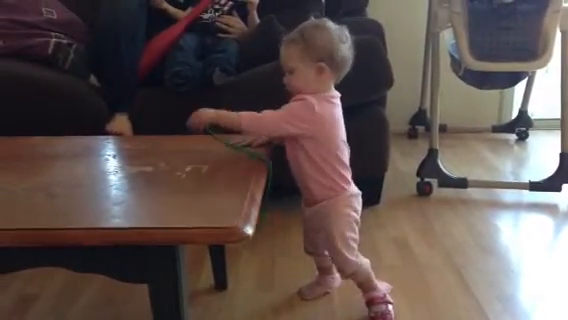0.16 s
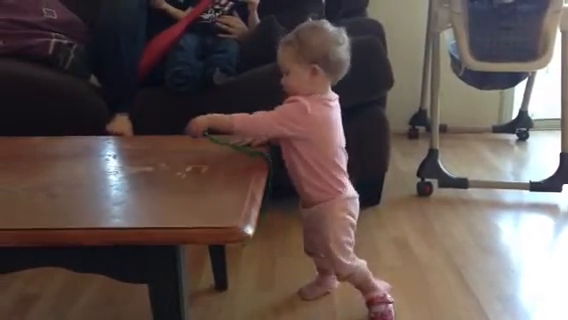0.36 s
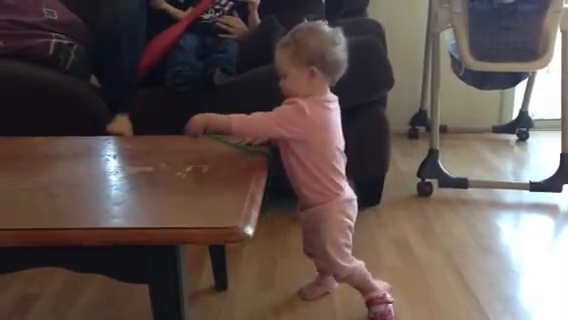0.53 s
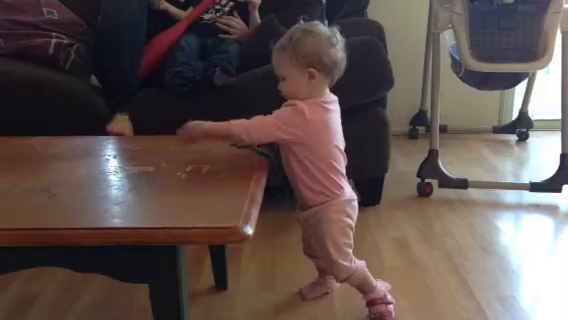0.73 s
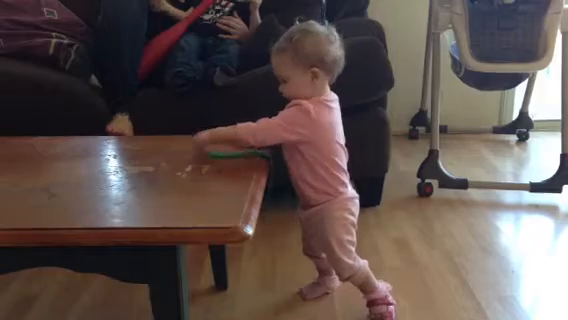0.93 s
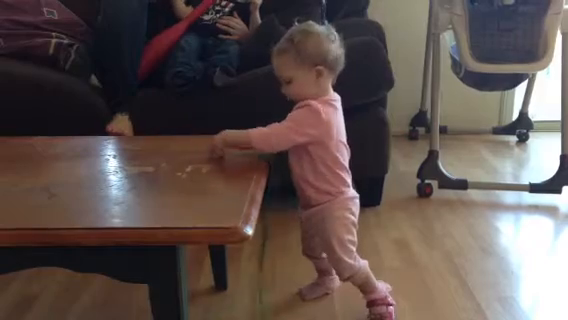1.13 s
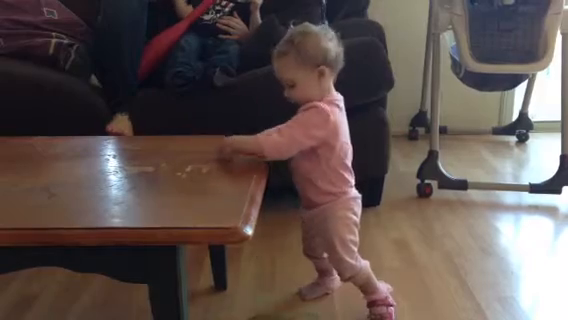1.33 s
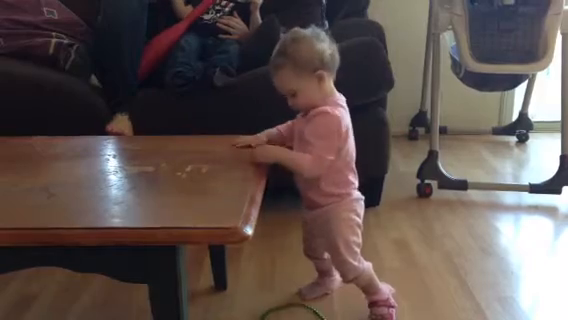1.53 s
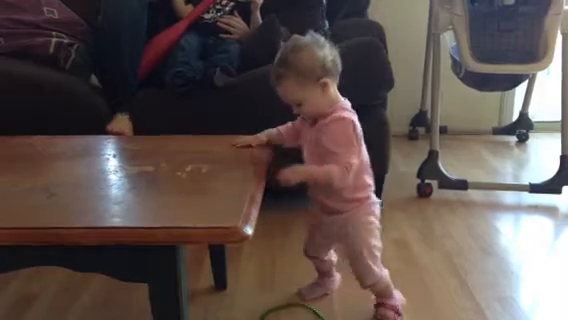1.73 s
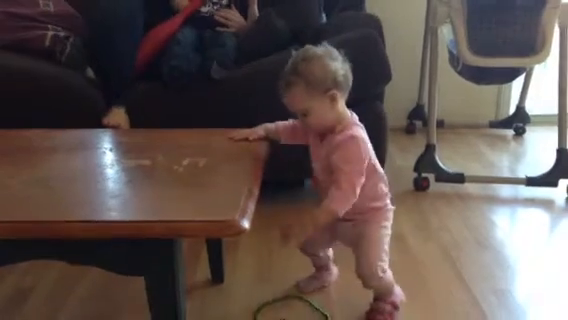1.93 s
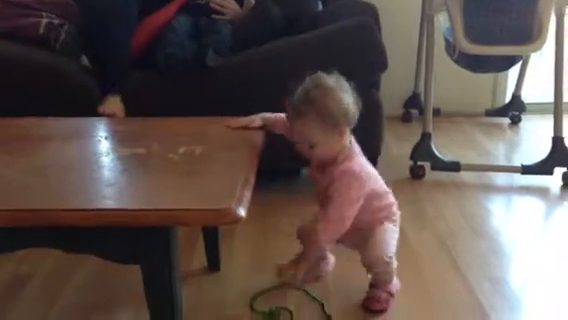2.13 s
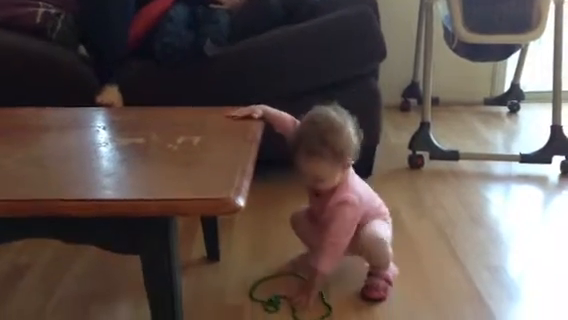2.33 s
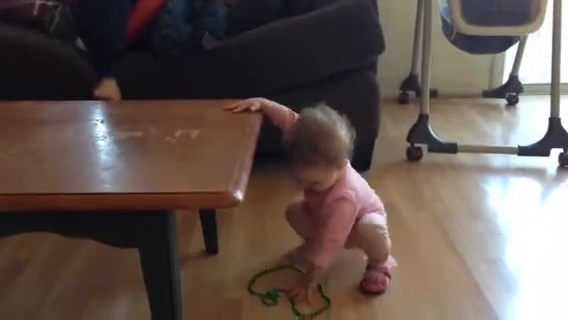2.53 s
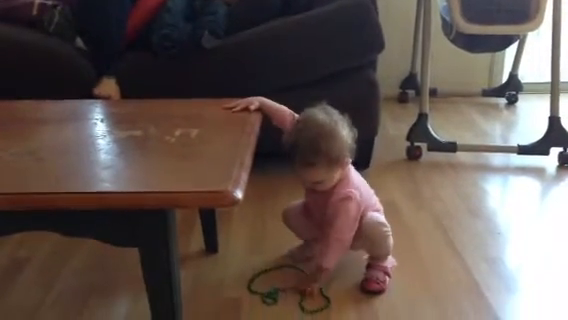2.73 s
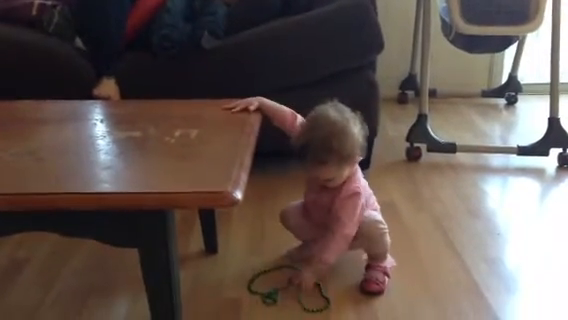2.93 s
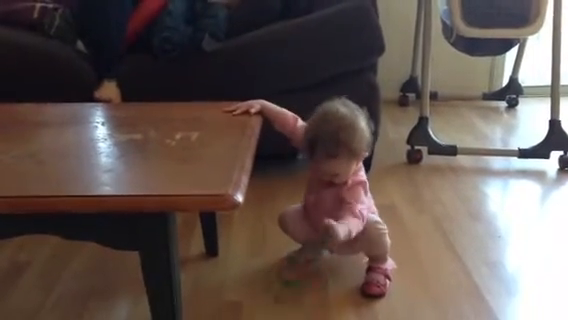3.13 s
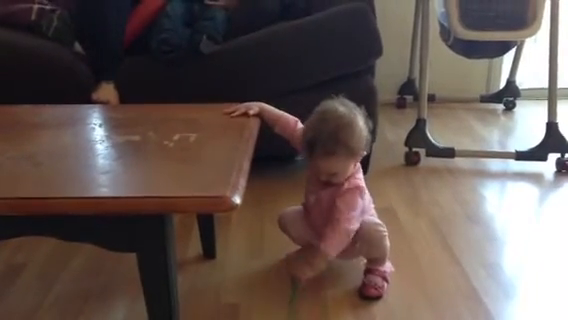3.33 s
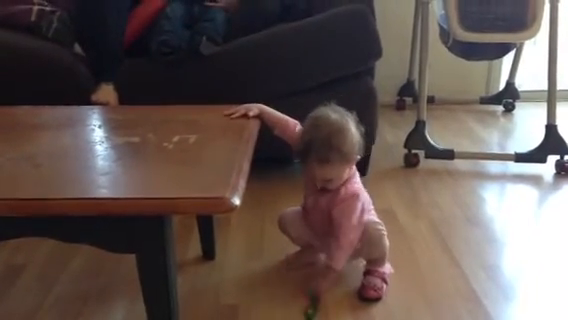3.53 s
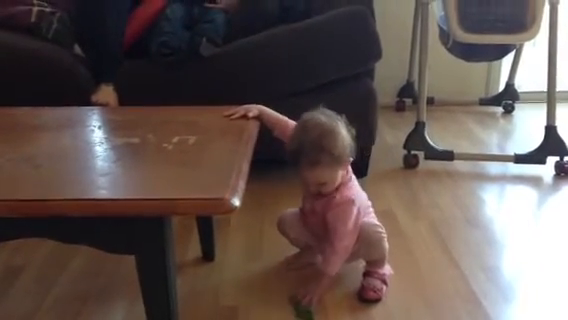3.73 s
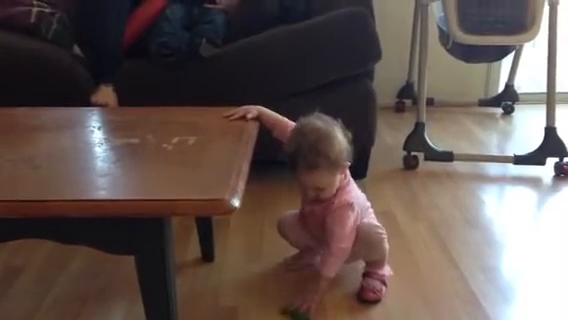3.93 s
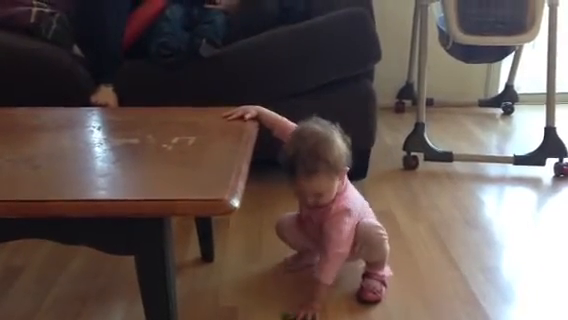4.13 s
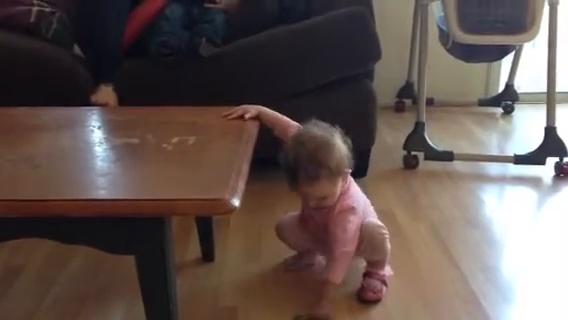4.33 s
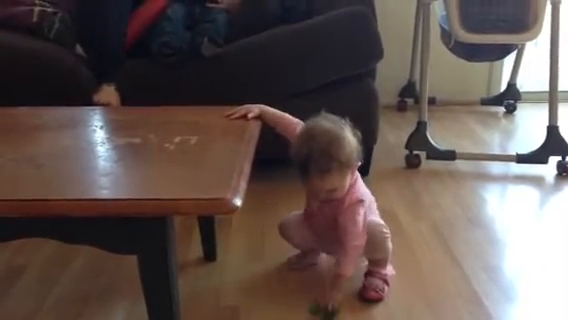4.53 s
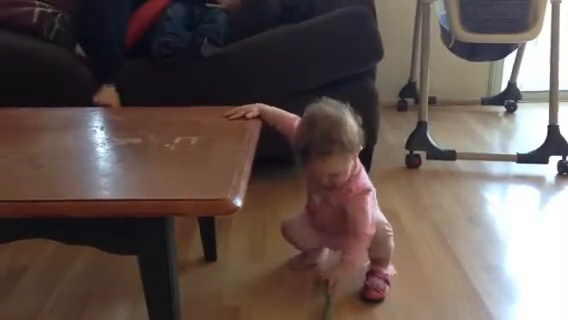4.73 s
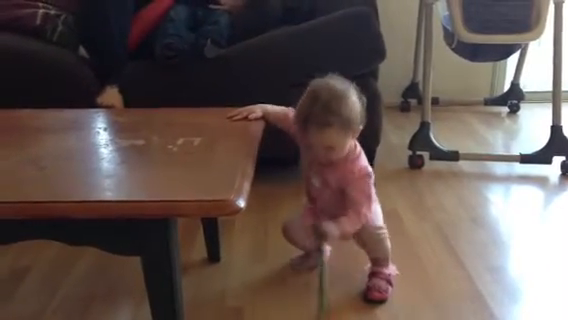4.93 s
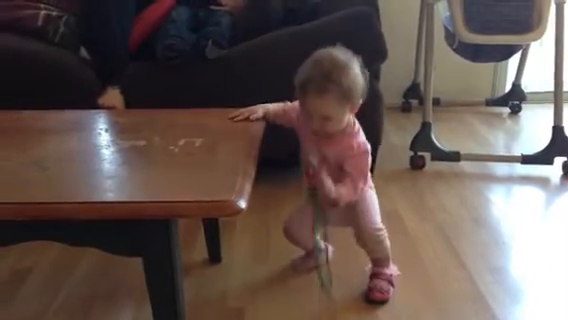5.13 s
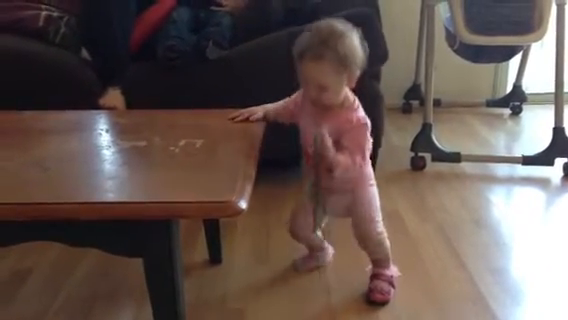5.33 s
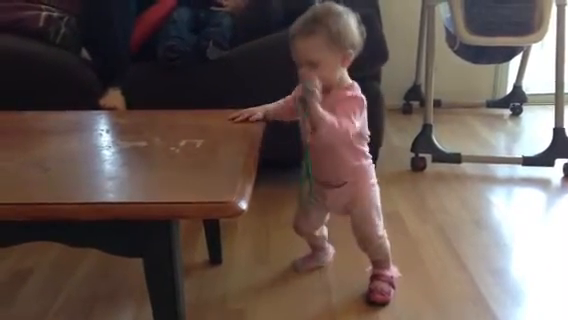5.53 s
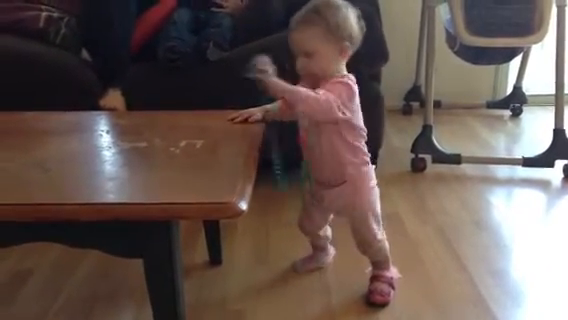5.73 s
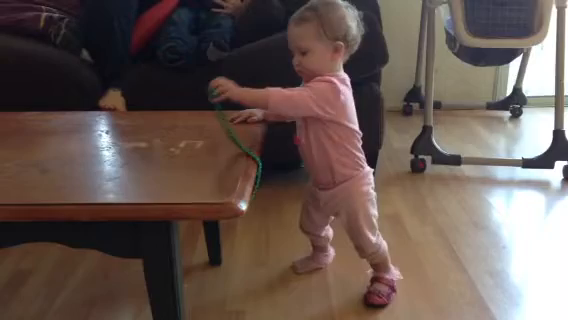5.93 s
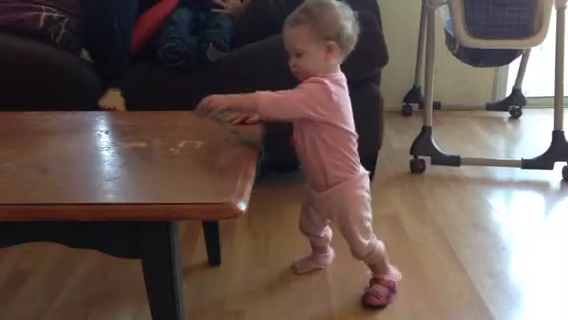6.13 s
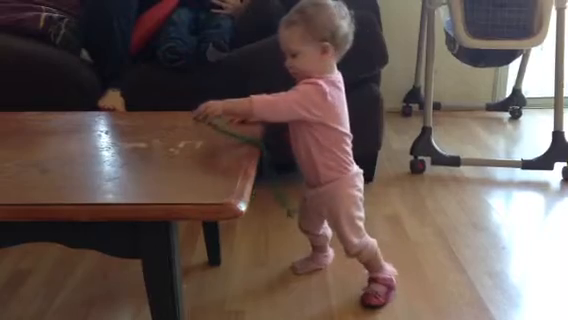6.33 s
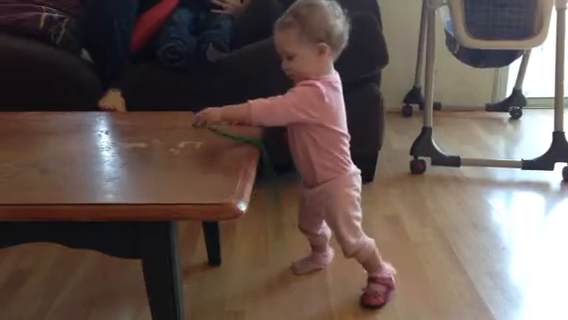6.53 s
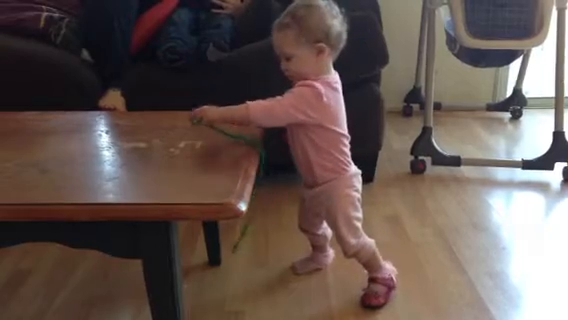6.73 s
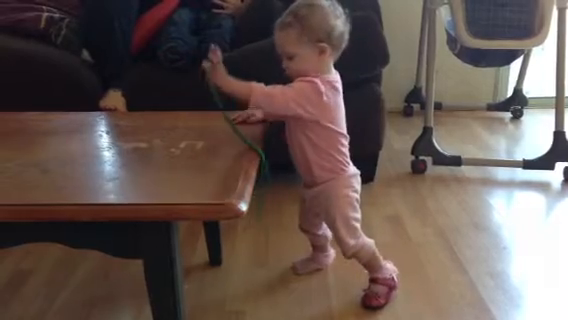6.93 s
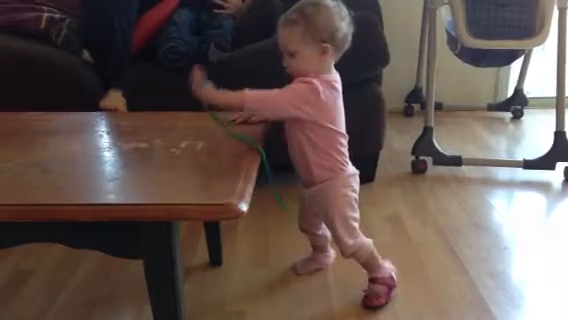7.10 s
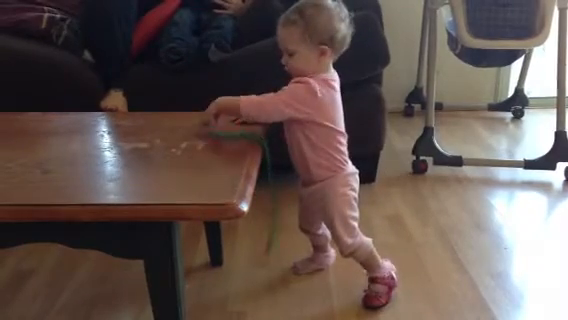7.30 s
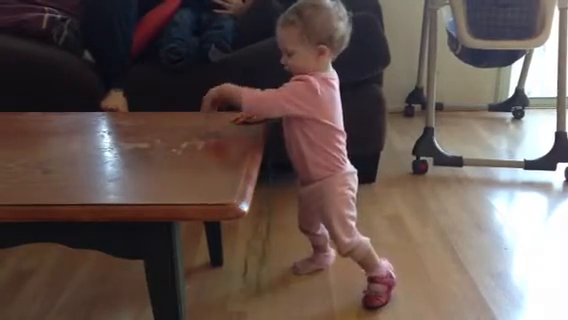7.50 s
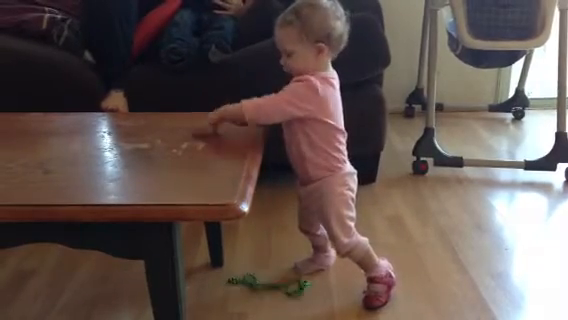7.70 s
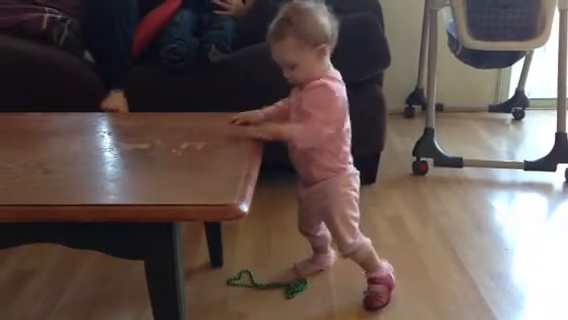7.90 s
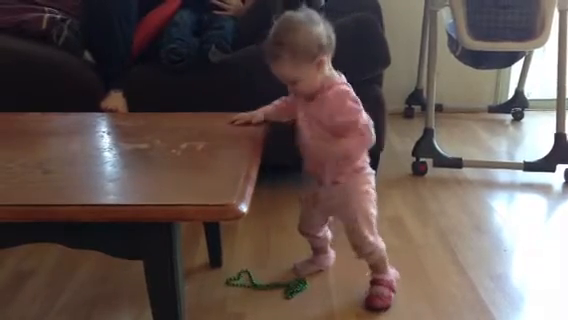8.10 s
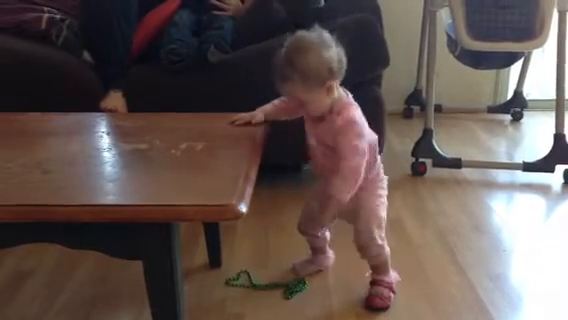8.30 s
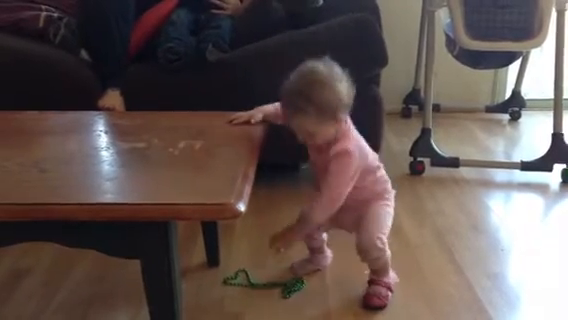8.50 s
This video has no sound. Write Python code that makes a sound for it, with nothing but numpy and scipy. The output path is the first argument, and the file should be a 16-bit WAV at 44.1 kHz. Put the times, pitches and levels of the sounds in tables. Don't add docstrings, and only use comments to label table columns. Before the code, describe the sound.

A string of plastic beads is dragged lightly over a wooden table, then slides off and hits the hardwood floor in a loud, dense burst of bright clacks. It is shuffled and shaken there, fading to tiny ticks. After a quiet gap it knocks onto the table again, drags, and falls once more. A small microphone hears it close in a reverberant living room, over low fridge hum and soft hiss.

```python
import sys
import numpy as np
from scipy import signal
from scipy.io import wavfile
from scipy.ndimage import uniform_filter1d

SR = 44100
rng = np.random.default_rng(int(sys.argv[2]) if len(sys.argv) > 2 else 0)


def unload_audio(sound):
    columns = np.transpose(np.atleast_2d(sound))
    steps = np.round(np.clip(columns, -1, 1) * 32767)
    wavfile.write(sys.argv[1], SR, steps.astype(np.int16))


def attenuation_scalar(level_db):
    decades = np.asarray(level_db, float) / 20
    return 10 ** decades


N = 377348

# start in seconds, peak in dB, click pitch in Hz.
FALLING_BEADS = [(1.2466, -12.6, 4930), (1.2607, -15.6, 5210), (1.2948, -14.7, 4910), (1.3263, -15.7, 4910),
                 (1.3367, -13.3, 4820), (1.3409, -12.5, 4620), (1.3467, -4.7, 5210), (1.35, -5.2, 5650),
                 (1.3549, -7.2, 4700), (1.3593, -3.3, 4750), (1.3638, -6.4, 5200), (1.3756, -8.1, 4850),
                 (1.4479, -18.5, 5290), (1.4714, -19, 4800), (1.5114, -28.2, 5980), (1.5871, -28.8, 5490),
                 (1.6249, -36.2, 5470), (7.6004, -11.5, 4740), (7.6077, -11.7, 4990), (7.6505, -13.9, 5300),
                 (7.6589, -10.7, 4580), (7.6687, -12.1, 4830), (7.6913, -9, 4780), (7.7008, -4.2, 5480),
                 (7.705, -7.5, 5270), (7.7575, -20.9, 5280), (7.8003, -21.1, 4920)]
# start in seconds, peak in dB, pitch in Hz.
HANDLED_BEADS = [(2.4171, -47.3, 5080), (2.8167, -40.7, 4960), (2.8974, -40.9, 4880), (3.0111, -25.1, 4860),
                 (3.0462, -27.5, 4680), (3.0936, -24.7, 4990), (3.1374, -25.2, 4680), (3.211, -28.2, 5110),
                 (3.3157, -27.1, 5330), (3.3219, -20.7, 5660), (3.352, -18, 6040), (3.3549, -16.4, 5730),
                 (3.3804, -10.7, 6200), (3.4014, -9, 5480), (3.4122, -12, 5940), (3.4958, -17.7, 5850),
                 (3.6062, -27.7, 5740), (3.6664, -26.7, 5400), (3.7265, -26.6, 5040), (3.821, -22.2, 4970),
                 (3.8287, -23.7, 5540), (3.8734, -32.8, 5250), (4.347, -30.1, 5600), (4.3917, -29.6, 5760),
                 (4.537, -31.5, 5570), (4.611, -31.6, 5290), (4.9244, -36, 5760), (5.0685, -29.8, 5180),
                 (5.0753, -31.7, 5570), (5.1655, -35.2, 5600)]
# start in seconds, length in seconds,
# mean gap in ms, peak in dB, click pitch in Hz.
BEAD_RUNS = [(1.252, 0.072, 5.92, -19.5, 4910), (1.363, 0.0146, 4.3, -10.5, 4970),
             (1.45, 0.0362, 8.1, -23, 5080), (1.592, 0.00965, 4, -31, 5300),
             (2.725, 0.0647, 12, -49.5, 4800), (2.97, .02, 10.7, -46.5, 4900),
             (3.059, 0.1328, 9, -30, 4880), (3.324, 0.0442, 6.62, -27, 5414),
             (3.387, 0.033, 7.08, -15, 5600), (3.502, .04, 8, -20.5, 5550),
             (3.668, 0.00863, 2.47, -31, 4950), (3.742, .06, 13.1, -36, 5250),
             (3.888, 0.066, 14.4, -41.5, 4894), (4.176, .14, 15.7, -42.5, 5080),
             (4.351, 0.128, 15.46, -33, 5640), (4.502, 0.154, 24.3, -37.5, 5402),
             (4.786, .33, 26, -40.5, 5652), (7.601, 0.02537, 3.03, -16.5, 4928),
             (7.627, 0.02006, 7.4, -22, 4950), (7.678, .021, 4.97, -14, 4735),
             (7.699, 0.02615, 3.72, -12, 4890), (7.785, 0.0417, 8.89, -23, 4750),
             (7.845, .055, 10.72, -35.5, 4642)]
# start in seconds, rise in seconds,
# top level in dB, fall in dB per second.
FLOOR_MOVEMENTS = [(1.245, 0.147, -36, 132.5), (2.05, 0.0447, -72.5, 23), (2.41, 0.0118, -65.5, 95.5),
                   (2.64, 0.027, -65.5, 18), (2.8, 0.053, -65.5, 120.5), (3.008, 0.087, -50, 150.5),
                   (3.315, 0.073, -36.5, 69), (3.45, 0.0635, -41, 99.5), (3.82, 0.0947, -59, 120),
                   (4.0, 0.041, -66.5, 23), (4.17, 0.053, -62.5, 18), (4.32, 0.0575, -50, 47.5),
                   (4.77, 0.009, -60.5, 33), (4.88, 0.058, -60.5, 42.5), (5.06, 0.067, -60, 200.5),
                   (7.599, 0.089, -32.5, 138)]
# frequency in Hz, spectral level in dB per Hz.
FLOOR_COLOUR = [(120, -77.5), (200, -38), (352, -8), (454, -14), (630, -19.5), (940, -19.5), (2850, -10),
                (3750, -3.5), (5200, -9), (7480, -12.5), (15500, -33)]
# frequency in Hz, spectral level in dB per Hz.
FIZZ_COLOUR = [(1000, -36.5), (4000, 7), (7000, 2), (10000, -5), (15500, -14)]
# start in seconds, level in dB.
BOARD_THUDS = [
    (1.35, -40),
    (1.36, -31.5),
    (3.353, -41),
    (3.4, -47.5),
    (7.602, -42.5),
    (7.622, -41),
    (7.7, -37),
    (6.271, -44.5),
]
# frequency in Hz, width in Hz, level in dB.
BOARD_MODES = [(184, 43, -11.5), (287.8, 67, -4), (423, 47, -0.5), (599.6, 290, 20.5), (922, 200, 3)]


def floor_beads():
    wood = tick(FLOOR_COLOUR, spread_ms=0.4357)
    fizz = tick(FIZZ_COLOUR, spread_ms=0.332)
    rows = FALLING_BEADS + HANDLED_BEADS + [row for run in BEAD_RUNS for row in run_of_beads(*run)]
    out = strikes(rows, [wood], body_db=1.5, chatter_ms=0.85, cycles=0.742, trim_db=1.4)
    for s, db, hz in rows:
        add(out, s - 20 / SR, attenuation_scalar(1.156 * db + 4.5) * signal.fftconvolve(fizz, chatter(2.2)))
    for s, db in BOARD_THUDS:
        add(out, s, attenuation_scalar(db + 20.5) * ring(BOARD_MODES))
    handling = movements(FLOOR_MOVEMENTS, haste=1)
    return out + patter(handling, [wood], per_s=1300, spread_db=4.0, trim_db=2.5)


# start in seconds, peak in dB, click pitch in Hz.
DRAGGED_BEADS = [(0.1576, -31.5, 2690), (0.1642, -45, 2710), (0.2127, -33, 2700), (0.2465, -29.5, 2380),
                 (0.2879, -34.5, 2300), (0.343, -49, 2800), (0.4346, -46, 2990), (0.4657, -39.5, 2200),
                 (0.6096, -41, 2900), (0.7039, -43, 1700), (0.8334, -39.5, 2930), (0.8415, -45, 2940),
                 (0.8775, -33.5, 2810), (1.0005, -38.5, 2900), (1.023, -35.5, 2230), (1.0622, -26.5, 2733),
                 (1.072, -22.5, 2500), (1.0867, -28, 2505), (1.1056, -26.5, 2900), (1.1387, -39, 2580),
                 (1.1473, -38, 3165), (1.1738, -46, 2950),
                 (5.881, -31, 2627), (5.8818, -18, 3010), (6.0213, -27, 2550), (6.0444, -32, 1590),
               (6.1215, -34.5, 1520), (6.1469, -41, 2980), (6.1477, -14.5, 3000), (6.154, -15.5, 2820),
               (6.238, -26.5, 1490), (6.5508, -40, 2670), (6.7377, -44, 2655), (6.8481, -38.5, 3000),
               (6.885, -19.5, 1607), (7.1165, -31.5, 2670), (7.1172, -33, 3060), (7.1509, -50, 2700),
               (7.1708, -26, 2820), (7.284, -22, 3000), (7.3534, -30, 1590), (7.4125, -23, 3030),
               (7.4492, -19, 3500)]
# start in seconds, rise in seconds,
# top level in dB, fall in dB per second, fizz against knocks in dB.
TABLE_MOVEMENTS = [(0, 0.00224, -57, 68, -6.5), (0.144, 0.0156, -44.5, 48.3, -27),
                   (.42, 0.012, -48, 376, -5), (.69, .06, -55.5, 5, -9), (.9, 0.132, -45.5, 97, -18),
                   (1.03, 0.0347, -39, 166, -11), (1.126, 0.0145, -42.5, 286, -10),
                   (5.877, 0.0049, -37, 155, -7), (5.9, 0.014, -45, 340, -20),
                   (6.015, 0.0044, -43.5, 20.2, -17.5), (6.11, 0.0415, -40, 200, -19),
                   (6.142, 0.0062, -28.5, 256, -4), (6.231, 0.0021, -30, 156.5, -5),
                   (6.3, 0.0346, -44.5, 470, -13.5), (6.5, 0.062, -61, 600, -18.5),
                   (6.7, 0.072, -52.5, 34.5, -14.5), (6.78, 0.0945, -48.5, 300, -25),
                   (6.88, 0.0042, -37.5, 232, -32), (6.95, 0.015, -61.5, 63, 1),
                   (7.11, 0.0767, -42, 28.2, -15.5), (7.27, 0.00984, -37, 72.9, -13),
                   (7.33, 0.0395, -40, 115.9, -28), (7.401, 0.0768, -33.5, 650, -10.5)]
# frequency in Hz, spectral level in dB per Hz.
TABLE_COLOUR = [(300, -68), (700, -21.5), (1000, -5), (1500, -5.5), (2000, -1), (3100, -3), (4500, -0.5),
                (7300, -10), (15500, -37.5)]
# frequency in Hz, width in Hz, level in dB.
TABLE_MODES = [(940, 45, -20), (1200, 45, -10), (1500, 80, -4), (1640, 80, -5), (1800, 90, -7),
               (2150, 90, -5), (2380, 90, -4), (2670, 110, -3), (3050, 120, 2), (3550, 120, -1),
               (4200, 200, -10), (5300, 300, -12)]


def table_beads():
    places = [attenuation_scalar(-3.0) * ring(TABLE_MODES, place_db=3.0) for _ in range(12)]
    for wood in places:
        add(wood, 0, attenuation_scalar(-6.0) * tick(TABLE_COLOUR, spread_ms=0.9073))
    out = strikes(DRAGGED_BEADS, places, body_db=17.5, chatter_ms=5.2, cycles=2.0, trim_db=-10.5)
    knock_rows = [row[:4] for row in TABLE_MOVEMENTS]
    fizz_rows = [(s, rise, db + bright, fall) for s, rise, db, fall, bright in TABLE_MOVEMENTS]
    knocks = movements(knock_rows, haste=1)
    fizz = movements(fizz_rows, haste=1.9)
    out += patter(knocks, places, per_s=1800, spread_db=4.0, trim_db=-2.0)
    return out + patter(fizz, [tick(FIZZ_COLOUR, spread_ms=0.3)], per_s=2480, spread_db=2.5, trim_db=-2.0)


def run_of_beads(start, length, gap_ms, db, hz):
    gap_scatter, strength_scatter_db, pitch_scatter = 0.6, 2, 0.06
    luck = rng.standard_normal((30, 3))
    gaps = gap_ms / 1000 * np.exp(gap_scatter * luck[:, 0] / 2)
    s = np.cumsum(gaps) - gap_ms / 2000
    peak_db = db + strength_scatter_db * luck[:, 1]
    pitch = hz * (1 + pitch_scatter * luck[:, 2])
    rows = np.transpose([start + s, peak_db, pitch])
    return list(rows[s < length])


def strikes(rows, bodies, body_db, chatter_ms, cycles, trim_db):
    out = np.zeros(N)
    for k, (s, db, hz) in enumerate(rows):
        add(out, s - 64 / SR, attenuation_scalar(db + trim_db) * bead(hz, cycles, fall=0.11))
        knock = signal.fftconvolve(bodies[k % len(bodies)], chatter(chatter_ms))
        add(out, s - 20 / SR, attenuation_scalar(db + trim_db + body_db) * knock)
    return out


def bead(hz, cycles, fall):
    u = np.arange(-64, 128) / SR * hz
    swell = np.exp(-0.5 * (u / cycles) ** 2)
    return swell * np.cos(2 * np.pi * (u - fall * u ** 2 / 2 + rng.random()))


def chatter(ms):
    age_ms = np.arange(400) / SR * 1000
    burst = rng.standard_normal(400) * np.exp(-age_ms / ms)
    return burst / np.linalg.norm(burst)


def patter(level, bodies, per_s, spread_db, trim_db):
    chance = per_s / SR * attenuation_scalar(2.6 * drift(200))
    size = attenuation_scalar(spread_db * np.minimum(rng.exponential(1, N), 3)) * rng.choice([-1., 1.], N)
    knocks = attenuation_scalar(trim_db) * level * evened(size * (rng.random(N) < chance))
    place = rng.integers(0, len(bodies), N // 600 + 1).repeat(600)[:N]
    return sum(signal.oaconvolve(knocks * (place == k), body)[:N] for k, body in enumerate(bodies))


def movements(rows, haste):
    swell_db, longest_s = 11.5, 0.36
    t, power = np.arange(N) / SR, np.zeros(N)
    for s, rise, db, fall in rows:
        u = t[:round((abs(rise) + longest_s) * SR)] - rise
        shape_db = np.where(u < 0, swell_db * u / rise, -haste * fall * u)
        add(power, s, attenuation_scalar(2 * (db + shape_db)))
    return np.sqrt(power)


def ring(modes, place_db=0):
    t = np.arange(SR // 12) / SR
    luck = rng.standard_normal((len(modes), 2))
    out = np.zeros(len(t))
    for (hz, width, db), (strength, side) in zip(modes, luck):
        gain = np.sign(side) * attenuation_scalar(db + place_db * strength) * np.sqrt(width)
        out += gain * np.exp(-np.pi * width * t) * np.sin(2 * np.pi * hz * t)
    return out / np.linalg.norm(out)


def tick(points, spread_ms):
    hz = np.fft.fftfreq(4096, 1 / SR)
    log_gain = read(points, abs(hz)) * np.log(10) / 20
    lag = 4 * np.pi * spread_ms / 1000 * np.sqrt(4000 * abs(hz)) * np.sign(hz)
    minimum_phase = np.conj(signal.hilbert(log_gain))
    click = np.fft.ifft(np.exp(minimum_phase - 1j * lag)).real[:1024]
    return click / np.linalg.norm(click)


# frequency in Hz, decay time to -60 dB in seconds.
ROOM_DECAY = [(200, 0.15), (660, 0.43), (1740, 0.305), (4590, 0.45), (12100, 0.34)]
# frequency in Hz, level against the direct sound in dB.
ECHO_TINT = [(300, 3.5), (1000, 7), (3300, 3), (5000, -2), (8000, 2.5), (14000, 10)]


def room(x, wet_db, early_db, slap_db):
    taps = np.zeros(3 * SR // 4)
    at = np.arange(60, len(taps) - 20, 10)
    taps[at + rng.integers(0, 10, len(at))] = rng.choice([-1., 1.], len(at))
    hz, t, z = signal.stft(taps, SR, nperseg=256)
    early = 1 + attenuation_scalar(early_db - 60 * t / 0.0971)
    z = z * attenuation_scalar(-60 * t / read(ROOM_DECAY, hz)[:, None]) * early
    energy = np.linalg.norm(signal.istft(z, SR, nperseg=256)[1])
    tail = signal.istft(z * attenuation_scalar(read(ECHO_TINT, hz))[:, None], SR, nperseg=256)[1]
    tail *= attenuation_scalar(wet_db) / energy
    tail[round(0.004 * SR)] += attenuation_scalar(slap_db)
    return signal.oaconvolve(x, tail)[:N]


# frequency in Hz, spectral level in dB.
QUIET_COLOUR = [(30, -44), (85, -40), (105, -31), (135, -21.5), (170, -7), (300, -11.5), (450, -15.5),
                (700, -19), (1290, -28), (1770, -27.5), (8000, -35.5), (15500, -37.5)]
# frequency in Hz, rms level in dB, wavering in dB.
HUM_LINES = [(118.76, -71, 3), (359.65, -63.5, 2.5)]


def background():
    frames, hz = N // 256 + 5, np.fft.rfftfreq(1024, 1 / SR)
    a, b, patches = rng.standard_normal((frames, 513, 3)).T
    patches = evened(uniform_filter1d(uniform_filter1d(patches, 3, 0), 10, 1))
    lumpy_db = 2.5 / (1 + (hz / 600) ** 2)
    level_db = read(QUIET_COLOUR, hz)[:, None] + lumpy_db[:, None] * patches
    noise = signal.istft((a + 1j * b) * attenuation_scalar(level_db), nperseg=1024, noverlap=768)[1][:N]
    out = attenuation_scalar(-58.5) * evened(noise)
    t = np.arange(N) / SR
    for f, db, waver_db in HUM_LINES:
        out += np.sqrt(2) * attenuation_scalar(db + waver_db * drift(1500)) * np.sin(2 * np.pi * f * t)
    return out


def drift(samples):
    return evened(uniform_filter1d(uniform_filter1d(rng.standard_normal(N), samples), samples))


def evened(x):
    return x / np.sqrt(np.mean(x ** 2) + 1e-20)


def read(points, hz):
    f, value = np.transpose(points)
    return np.interp(np.log(hz + 1), np.log(f + 1), value)


def add(mix, s, sound):
    part = mix[round(s * SR):][:len(sound)]
    part += sound[:len(part)]


def scene():
    beads = floor_beads() + table_beads()
    turn = 2 * np.pi * 3.1 * np.arange(N) / SR
    spots = [(1 + np.cos(turn + 2 * np.pi * k / 3)) / 3 for k in range(3)]
    wet = sum(room(beads * np.sqrt(spot), wet_db=-4.8, early_db=2.0, slap_db=-19.0) for spot in spots)
    return (beads + wet + background())[None]


def top_cut(x):
    return signal.sosfilt(signal.butter(12, 16480, fs=SR, output="sos"), x)


def record(dry):
    cut = signal.sosfilt(signal.butter(6, 108, "highpass", fs=SR, output="sos"), dry)
    rumble = attenuation_scalar(-84.5) * evened(signal.lfilter([1], [1, -0.96], rng.standard_normal(N)))
    edge = signal.firwin(255, 15350, window=("kaiser", 3), fs=SR)
    mix = signal.oaconvolve(cut + rumble, edge[None], "same")
    return top_cut(mix)


dry = scene()
out = record(dry)
unload_audio(out)
```